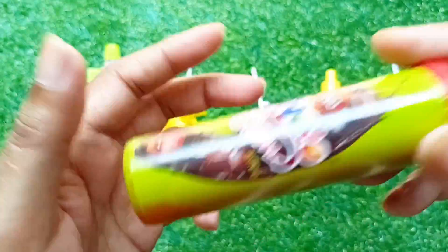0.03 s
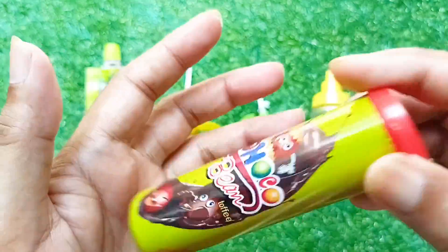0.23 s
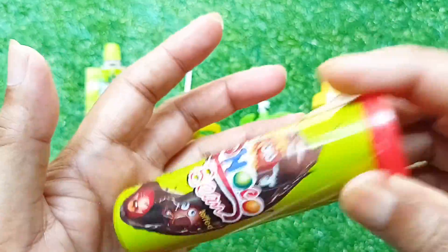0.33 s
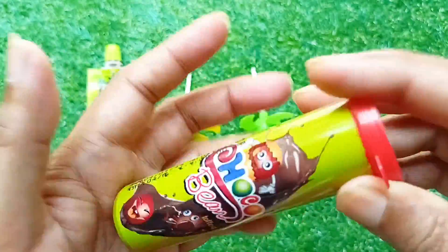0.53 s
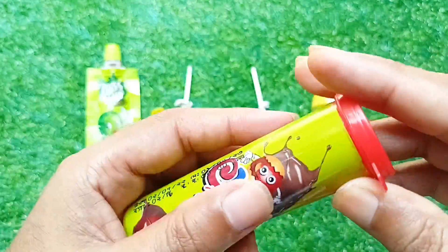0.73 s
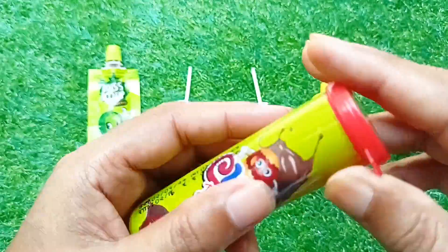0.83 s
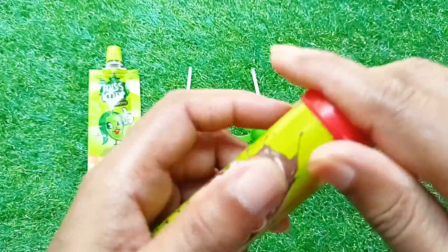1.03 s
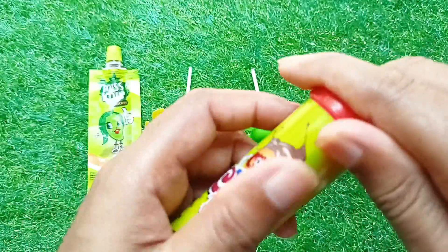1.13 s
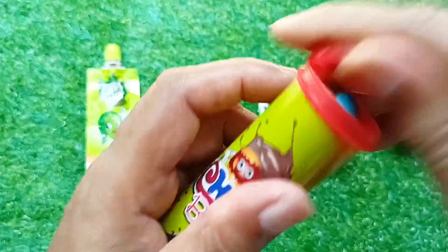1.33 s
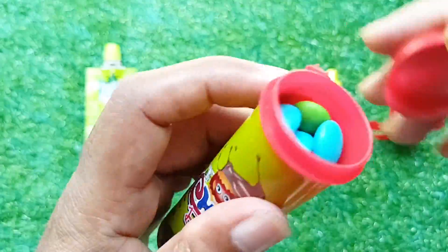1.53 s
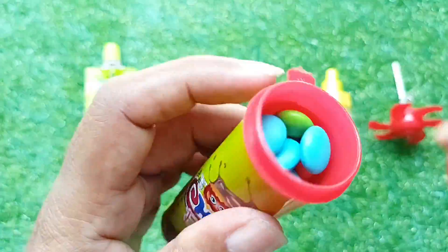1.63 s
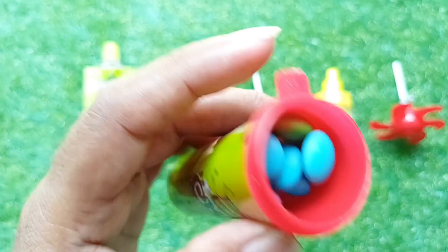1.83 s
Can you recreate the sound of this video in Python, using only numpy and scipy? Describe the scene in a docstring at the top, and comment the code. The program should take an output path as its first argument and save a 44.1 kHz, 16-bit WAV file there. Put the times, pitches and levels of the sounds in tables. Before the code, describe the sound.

Hard candies rattle in a plastic tube close to the microphone, clicking along the wall and slamming into the end at about 0.3, 0.5 and 0.65 seconds. At 1.4 seconds the cap comes off with a hollow pop and a short squeak, and the candies settle with a few clicks. A distant bird chirps faintly near 0.8, 1.2 and 1.5 seconds, over a low room rumble.

```python
"""A room with a short tail and a low rumble, one microphone close to a plastic tube of hard candies.
The tube is shaken three times: the candies click along its wall, then slam into its end.
The cap is pulled off with a hollow pop of air and a short squeak, and the candies settle.
Some way off a bird chirps three times, heard mostly by its reflections."""
import sys
import numpy as np
from scipy import signal
from scipy.io import wavfile
from scipy.ndimage import uniform_filter1d

SR = 44100
rng = np.random.default_rng(int(sys.argv[2]) if len(sys.argv) > 2 else 0)


def master_out(mix):
    """Clip the mix to full scale and print it as 16-bit PCM to the path in sys.argv[1]."""
    frames = np.transpose(np.atleast_2d(mix))
    ceiling = np.clip(frames, -1, 1)
    pcm = np.round(ceiling * 32767).astype(np.int16)
    wavfile.write(sys.argv[1], SR, pcm)


N = 83790

# spectrum of a contact with the tube's wall: frequency_hz, gain_db
WALL_SPECTRUM = [(100, -32.5), (200, -24), (330, -12), (700, -6), (880, -13.5), (1150, -7.5), (2200, -3),
                 (3200, 3.5), (5000, 0), (6600, -4), (8200, 0.5), (10000, -13), (15000, -15.5)]
# modes of the plastic tube: frequency_hz, level_db, t60_s
TUBE_MODES = [(2886, -13, .1), (3017, -12, .1), (3230, -12, .06), (3800, -14, .09), (4080, -10, .07),
              (4240, -10, .07), (4366, -8, .07), (4682, 0, .085), (4984, 0, .075), (5237, -4, .08),
              (5421, 0, .08), (6095, -8, .09), (7570, -11, .07), (8240, -10, .08)]


def amp(db):
    """Decibels to gain."""
    return 10 ** (np.asarray(db) / 20)


def unit_rms(x):
    """Scales to rms 1."""
    return x / np.sqrt(np.mean(x ** 2) + 1e-20)


def at_frequency(points, hz):
    """Reads a table on a log-frequency axis."""
    f, value = np.transpose(points)
    return np.interp(np.log(hz + 1), np.log(f + 1), value)


def add(mix, start_s, sound):
    """Mixes a sound in at a time."""
    part = mix[max(round(start_s * SR), 0):][:len(sound)]
    part += sound[:len(part)]


def colour(x, spectrum, tilt_db=0, size=2048):
    """Causal filter of unit energy with the given spectrum, tilted per octave above 500 Hz."""
    hz = abs(np.fft.fftfreq(size, 1 / SR))
    log_gain = np.log(amp(at_frequency(spectrum, hz) + tilt_db * np.log2(np.maximum(hz, 500))))
    taps = np.fft.ifft(np.exp(np.conj(signal.hilbert(log_gain)))).real[:size // 2]  # minimum phase
    return signal.fftconvolve(x, taps / np.linalg.norm(taps))[:len(x)]


def contact(decay_s, spike_share=.12, size=2048):
    """One contact: a spike holding a share of the energy, then a quickly dying scatter."""
    envelope = np.exp(-np.arange(size) / SR / decay_s)
    x = unit_rms(envelope * rng.standard_normal(size)) * np.sqrt((1 - spike_share) / size)
    x[0] = np.sqrt(spike_share)
    return x * np.linalg.norm(envelope)


def ring(modes, size=14000):
    """Dying modes, struck together; neighbours swing in opposite directions."""
    t = np.arange(size) / SR
    return sum((-1) ** k * amp(db - 60 * t / t60) * np.sin(2 * np.pi * hz * t)
               for k, (hz, db, t60) in enumerate(modes))


def wavering_phase(hz, jitter, count, smooth_samples):
    """Phase of a tone whose pitch wobbles at random by the rms fraction jitter."""
    wobble = unit_rms(uniform_filter1d(rng.standard_normal(count), smooth_samples))
    return 2 * np.pi * np.cumsum(hz * (1 + jitter * wobble)) / SR


def swell(middle_s, half_s, db):
    """A bell-shaped rise and fall of gain."""
    return amp(db) * np.exp(-((np.arange(N) / SR - middle_s) / half_s) ** 2)


def noise_swell(spectrum, middle_s, half_s, db):
    """A short swell of coloured noise."""
    return colour(swell(middle_s, half_s, db) * rng.standard_normal(N), spectrum)


def reflections(x, t60s, size=26000):
    """Sparse reflections dying by rows of frequency_hz, t60_s; a single row sets all bands."""
    taps = rng.standard_normal(size) * (rng.random(size) < .15)
    hz, t, bands = signal.stft(taps, SR, nperseg=256)
    decay = amp(-60 * t / at_frequency(t60s, hz)[:, None])
    tail = signal.istft(bands * decay, SR, nperseg=256)[1]
    tail *= np.minimum(np.arange(len(tail)) / SR / 0.0016, 1)  # fade in
    return signal.fftconvolve(x, tail / np.linalg.norm(tail))[:N]


def background():
    """Noise that swells and sinks as the recorder's noise suppressor opens and closes; rumble, hiss."""
    # spectra of the noise, a low rumble, a faint hiss and a thin far whine: frequency_hz, gain_db
    noise_spectrum = [(25, -29), (60, -8), (110, -3.5), (175, 1), (240, -8), (400, -12), (700, -12.5),
                      (900, -17.5), (1150, -17), (2500, -21), (6300, -27.5), (7700, -26), (9500, -32),
                      (15500, -43)]
    rumble_spectrum = [(25, -17.5), (60, -1.5), (110, 3.5), (180, -0.5), (300, -9.5), (1200, -20),
                       (5000, -54)]
    hiss_spectrum = [(1000, -28), (5000, -2.5), (6500, -6), (7500, 0), (8400, -1.5), (9500, -17),
                     (15000, -12.5)]
    whine_spectrum = [(3000, -45), (6700, -25), (7150, 0), (7500, 0), (7900, -22), (12000, -45)]
    # rise and fall of the first three: time_s, level_db
    noise_levels = [(0, -59.5), (.08, -62), (.16, -66.5), (.4, -62), (.78, -62.5), (.85, -61.5), (.92, -57),
                    (0.979, -60), (1.03, -63.5), (1.17, -64), (1.27, -59.5), (1.37, -64), (1.5, -61),
                    (1.63, -58), (1.71, -65.5), (1.9, -64)]
    rumble_levels = [(0, -61), (.17, -74.5), (.3, -56.5), (.55, -59.5), (.76, -57.5), (1.049, -73),
                     (1.33, -60.5), (1.57, -54), (1.72, -70), (1.9, -67.5)]
    hiss_levels = [(0, -71), (.7, -81), (.85, -66.5), (.94, -65), (1.05, -80), (1.17, -68), (1.3, -68.5),
                   (1.42, -77), (1.62, -64.5), (1.72, -80), (1.9, -76)]
    out = np.zeros(N)
    for spectrum, levels in ((noise_spectrum, noise_levels), (rumble_spectrum, rumble_levels),
                             (hiss_spectrum, hiss_levels)):
        gain = amp(np.interp(np.arange(N) / SR, *np.transpose(levels)))
        out += gain * unit_rms(colour(rng.standard_normal(N), spectrum, size=8192))
    return out + noise_swell(whine_spectrum, middle_s=1.24, half_s=.12, db=-67)


def room_tail(x, count=3, turn_hz=1.3):
    """A short, diffuse room tail: a few sets of reflections fade in turn, so no single pitch lingers."""
    # decay of the room: frequency_hz, t60_s
    t60s = [(200, 0.13), (1000, .27), (3000, .22), (5000, .21), (8000, .22), (15000, .2)]
    turn = 2 * np.pi * turn_hz * np.arange(N) / SR
    return sum(reflections(x * np.sqrt(2 / count) * np.cos(turn + np.pi * k / count), t60s)
               for k in range(count))


def distant_bird():
    """A whistle that sags, then drops away hoarsely, with more reflected than direct sound."""
    # chirps: start_s, pitch_hz, relative_level_db, onset_pitch_ratio
    chirps = [(.829, 2800, -40.5, 1.02), (1.172, 2697, -41.5, 0.96), (1.539, 2631, -41, 1.0)]
    # course of one chirp: time_s, pitch_ratio, gain_db
    chirp_shape = [(0, 1.0, -22), (0.029, 1.0, -14.5), (.040, .98, -3.5), (.058, .94, -5),
                   (0.072, .915, -1), (0.076, .81, -13), (.088, .64, -12), (0.099, .5, -26)]
    settle_s, octave_db = 0.0248, -26
    times, ratios, gains_db = np.transpose(chirp_shape)
    out, t = np.zeros(N), np.arange(0, times[-1], 1 / SR)
    jitter = .02 + .13 * (t / times[-1]) ** 6  # hoarse at the end
    for start_s, hz, db, onset_ratio in chirps:
        glide = np.interp(t, times, ratios) * (1 + (onset_ratio - 1) * np.exp(-t / settle_s))
        phase = wavering_phase(hz * glide, jitter, len(t), smooth_samples=40)
        whistle = np.sin(phase) + amp(octave_db) * np.sin(2 * phase)
        add(out, start_s, amp(db + np.interp(t, times, gains_db)) * whistle)
    near = reflections(out, [(2500, 0.16)])
    far = reflections(out, [(2500, 0.42)])
    return amp(-4) * out + near + amp(-5.5) * far


def cap_pop(pop_s=1.4324, rise_s=0.0012, scrape_decay_s=0.01):
    """Fingers brush the cap; then the rim scrapes free, air puffs and the air in the tube rings."""
    # modes of the air in the opened tube: frequency_hz, level_db, t60_s
    air_modes = [(149, -6, 0.072), (280.8, 3, 0.1), (412, -18.5, 0.048), (533, -14, 0.036),
                 (753, -7, 0.031), (783, -19.5, 0.29)]
    # spectra of the fingers, the first push of air and the rim: frequency_hz, gain_db
    grip_spectrum = [(500, -11), (3000, -3), (8000, 2), (10000, -10), (15000, -0.5)]
    puff_spectrum = [(60, -18), (160, -4), (300, -1.5), (650, 6), (950, -3.5), (1300, -26.5), (2500, -31),
                     (8000, -53)]
    rim_spectrum = [(200, -3), (1000, -3.5), (2500, -5.5), (3600, 6), (5600, 0), (6800, -4.5), (8200, 7),
                    (10000, -17), (15000, -9)]
    out = noise_swell(grip_spectrum, middle_s=1.173, half_s=.012, db=-63)
    air = ring(air_modes)
    t = np.arange(len(air)) / SR
    pop = air * (1 - np.exp(-t / rise_s))
    puff = colour(1. * (t == 0), puff_spectrum)
    scrape = colour(rng.standard_normal(len(t)) * np.exp(-t / scrape_decay_s), rim_spectrum)
    add(out, pop_s, amp(-26.5) * scrape - amp(-22) * pop - amp(-2) * puff)
    return out


def cap_squeak(start_s=1.4405, length_s=.018, jitter=0.0085):
    """The plastic of the cap squeaks: wavering partials with a rasp of friction."""
    # partials of the squeak: frequency_hz, level_db
    partials = [(3555, -9), (3750, -25), (4175, -7), (4705, -0.5), (4870, -25)]
    # spectrum of the friction: frequency_hz, gain_db
    rasp_spectrum = [(300, -5), (1200, -11), (2000, -2), (2600, -4.5), (3600, 7), (5500, -1), (6500, -6.5),
                     (8300, -2.5), (10000, -10), (15000, -16)]
    out, progress = np.zeros(N), np.arange(0, 1, 1 / (length_s * SR))
    tone = sum(amp(db) * np.sin(wavering_phase(hz, jitter, len(progress), smooth_samples=30))
               for hz, db in partials)
    rasp = colour(rng.standard_normal(len(progress)), rasp_spectrum)
    envelope = np.sqrt(abs(np.sin(np.pi * progress)))
    add(out, start_s, (amp(-26.5) * tone + amp(-28) * rasp) * envelope)
    return out


def candy_slides(grains_per_s=1500, spread_db=4.5):
    """The pile slides in a stream of tiny contacts, and once rubs back along the wall."""
    # the pile sliding and jostling: middle_s, half_length_s, level_db
    slides = [(0.23, 0.015, -31), (0.277, 0.009, -30), (0.299, .009, -21), (0.429, 0.017, -42.5),
              (.470, 0.0069, -25), (0.61, 0.011, -30), (0.659, 0.0089, -26.5), (1.494, 0.04, -45.5)]
    # spectrum of the rub: frequency_hz, gain_db
    rub_spectrum = [(500, -23), (2500, -18.5), (3100, 0), (3500, 0), (4200, -18), (12000, -38)]
    grains = (rng.random(N) < grains_per_s / SR) * rng.choice([-1, 1], N)
    strength = amp(spread_db * np.minimum(rng.exponential(1, N), 2))
    motion = sum(swell(*slide) for slide in slides)
    rub = noise_swell(rub_spectrum, middle_s=.418, half_s=0.025, db=-45.5)
    return colour(unit_rms(grains * strength) * motion, WALL_SPECTRUM) + rub


def candy_clicks():
    """Single candies knock on the wall and on each other; the tube rings faintly along."""
    # knocks: start_s, relative_level_db, tilt_db_per_octave
    clicks = [(.0245, -40.5, -1.5), (.0612, -35.5, 0.5), (.1348, -49, -2.5), (.2046, -21.5, -1.5),
              (.2110, -20, 4.5), (.2164, -20, 1.5), (.2214, -17.5, 5), (.2305, -18.5, 1.5),
              (.2511, -18, -2), (.2625, -17, 2.5), (.2707, -16.5, 6), (.2762, -16.5, 3), (.2788, -21, -1),
              (.2884, -24, -2), (.3074, -22.5, 1.5), (.3168, -24.5, 1), (.3258, -22, 3), (0.4056, -39, 0),
              (.4092, -25.5, 1), (.4189, -24, 2), (.4232, -30.5, -1), (.4470, -21, -0.5),
              (.4583, -29, -3.5), (.5163, -30, -2.5), (0.58, -26.5, 2), (.5847, -31, -4.5),
              (.5900, -36.5, -4.5), (.5999, -15.5, 2), (.6032, -11.5, 4.5), (.6065, -18, 2),
              (.6099, -27, 2.5), (.6148, -26.5, 6.5), (.6205, -39, -2), (.6250, -29, -2.5),
              (.6472, -23, 10), (1.4743, -28.5, -3.5), (1.4788, -24, 1.5), (1.4985, -37, -3),
              (1.5063, -21.5, 0.5), (1.5204, -28, 4), (1.5363, -25.5, 0.5), (1.5496, -21, 12.5),
              (1.5675, -42.5, 5.5), (1.5815, -42, 4.5), (1.684, -57.5, 9), (1.7495, -51.5, 6),
              (1.797, -52.5, 1.5), (1.830, -52, 4.5), (1.8365, -48, -3.5)]
    out, tube_ring = np.zeros(N), ring(TUBE_MODES)
    for start_s, db, tilt_db in clicks:
        click = colour(contact(decay_s=0.0011), WALL_SPECTRUM, tilt_db)
        add(out, start_s, amp(db - 1) * click)
        add(out, start_s, amp(db - 36) * tube_ring)
    return out


def candy_slams():
    """Each shake throws the pile into the end of the tube: a cluster of hard hits that ring it."""
    # candies striking the end: start_s, relative_level_db
    hits = [(.2948, -14.5), (.2963, -10), (.2988, -8), (.3012, -19.5), (.4615, -17), (.4647, -8),
            (.4672, -12), (.4684, -3.5), (.4710, -11), (.6505, -23), (.6526, -12), (.6552, -5.5),
            (.6577, -3), (.6598, -22.5)]
    # spectrum of a contact with the end: frequency_hz, gain_db
    end_spectrum = [(100, -44.5), (200, -32), (350, -17.5), (700, -11), (880, -23.5), (1300, -17.5),
                    (2200, -11.5), (3200, -2), (4200, -0.5), (5100, 7.5), (6800, -6.5), (8100, -1.5),
                    (10000, -14), (15000, -15)]
    out, tube_ring = np.zeros(N), ring(TUBE_MODES)
    for start_s, db in hits:
        hit = colour(contact(decay_s=0.0014), end_spectrum)
        add(out, start_s, amp(db - 1.5) * hit)
        add(out, start_s, amp(db - 22) * tube_ring)
    return out


def scene():
    """The small tube, weak in the bass, close by with near reflections and room; the bird farther off."""
    tube = candy_clicks() + candy_slams() + candy_slides() + cap_pop() + cap_squeak()
    tube = signal.sosfilt(signal.butter(3, 110, "high", fs=SR, output="sos"), tube)
    near = amp(-9) * reflections(tube, [(2500, 0.062)])
    return (tube + near + amp(-16) * room_tail(tube) + distant_bird() + background())[None]


def record(dry):
    """The microphone's bass roll-off, soft overload on the hardest hits, then the band limit."""
    low_hz, high_hz = 44.7, 15650
    bass_roll_off = signal.butter(2, low_hz, "high", fs=SR, output="sos")
    overloaded = np.tanh(signal.sosfilt(bass_roll_off, dry))
    band_limit = signal.firwin(401, high_hz, window=("kaiser", 8), fs=SR)
    return signal.oaconvolve(overloaded, band_limit[None], "same")


dry = scene()
out = record(dry)
master_out(out)
```